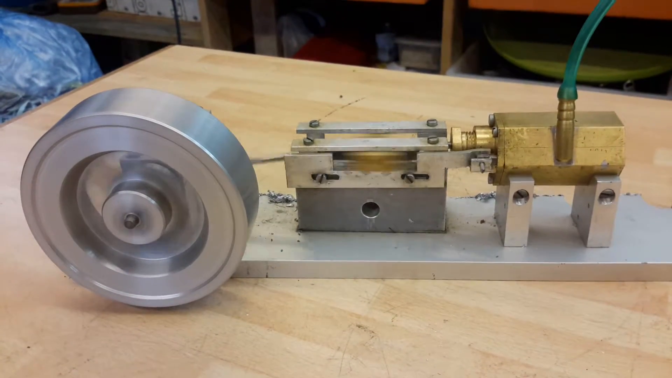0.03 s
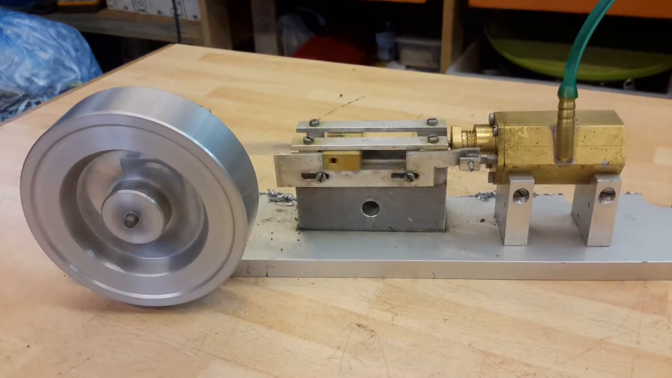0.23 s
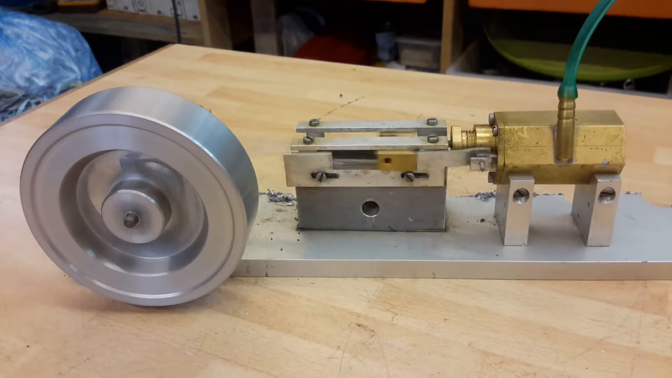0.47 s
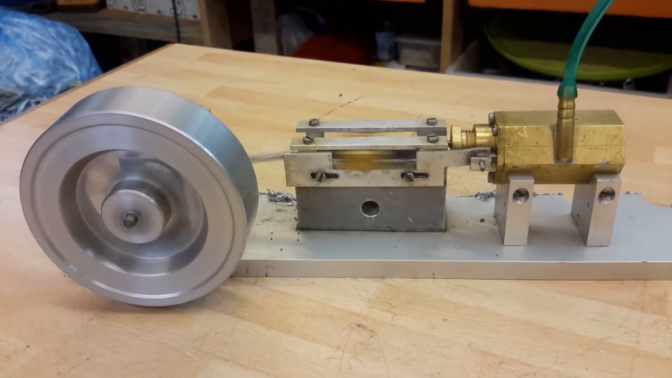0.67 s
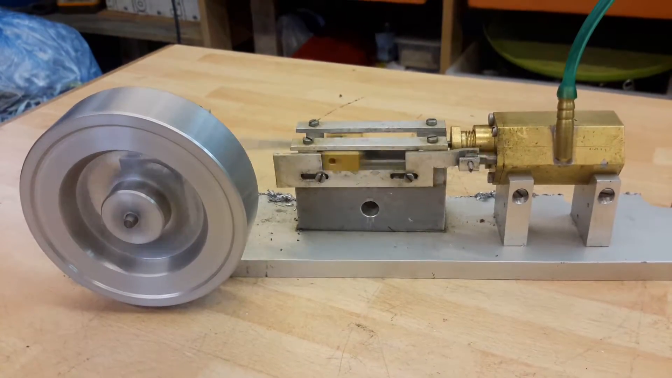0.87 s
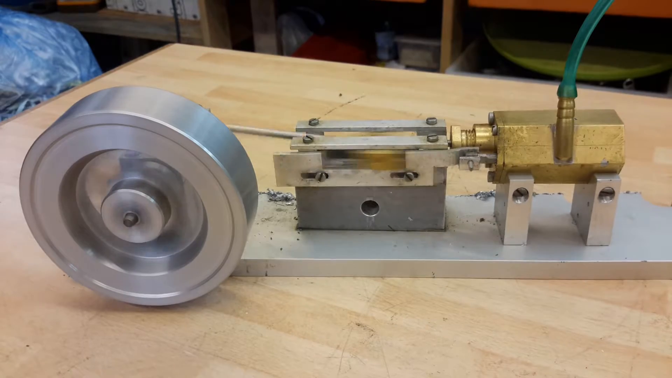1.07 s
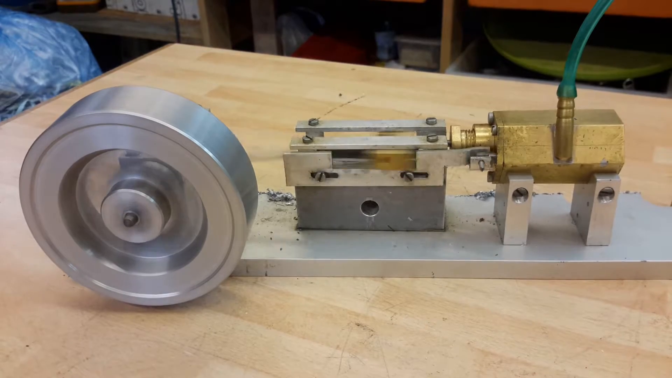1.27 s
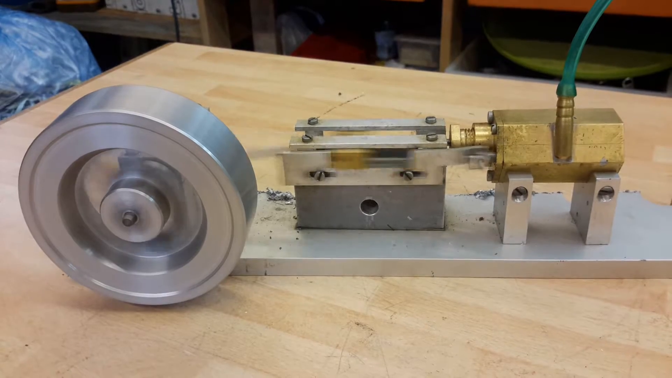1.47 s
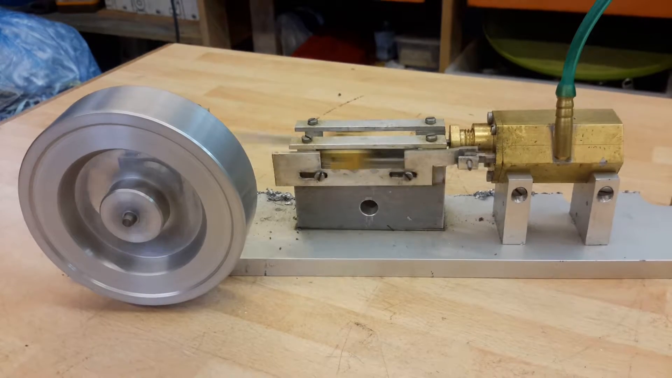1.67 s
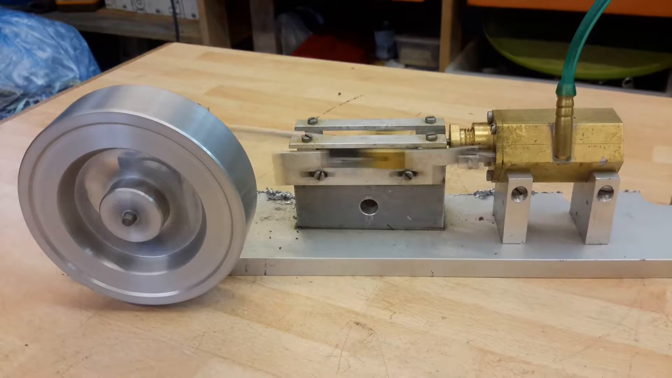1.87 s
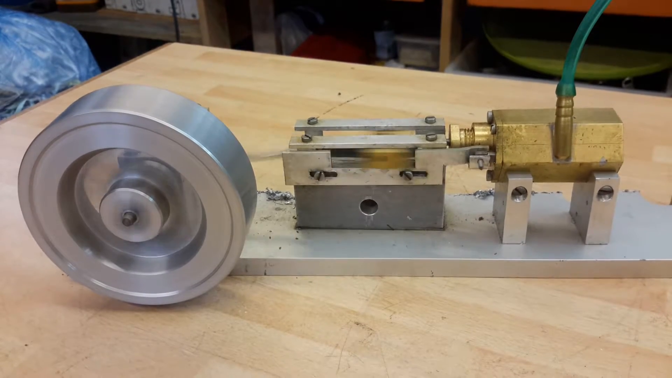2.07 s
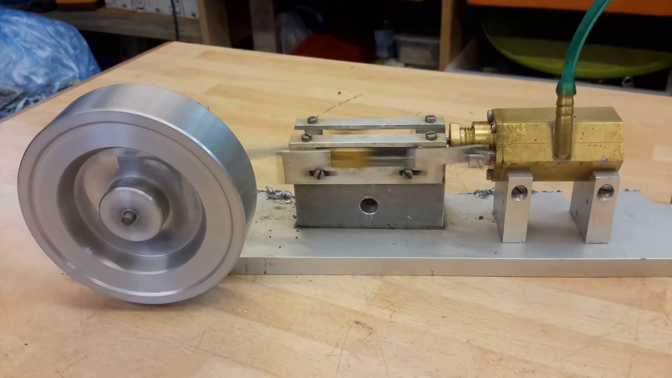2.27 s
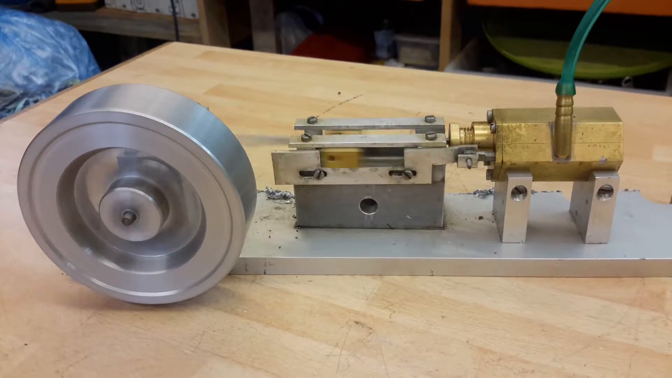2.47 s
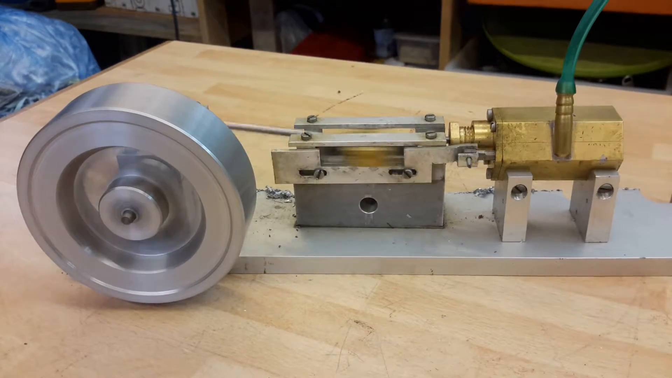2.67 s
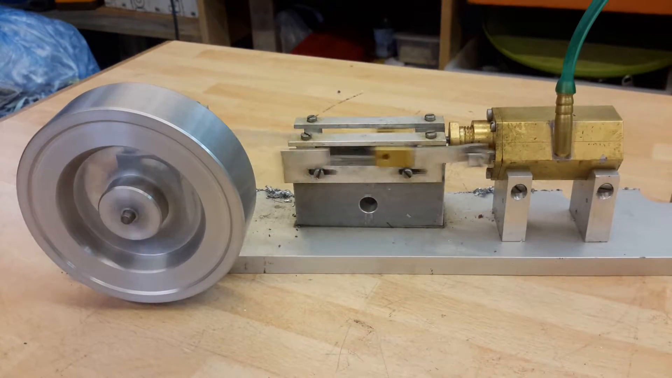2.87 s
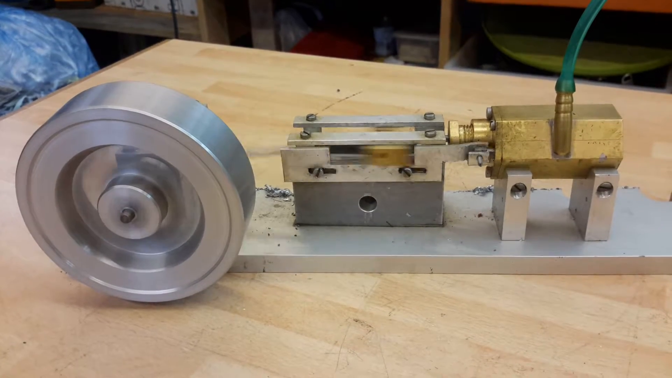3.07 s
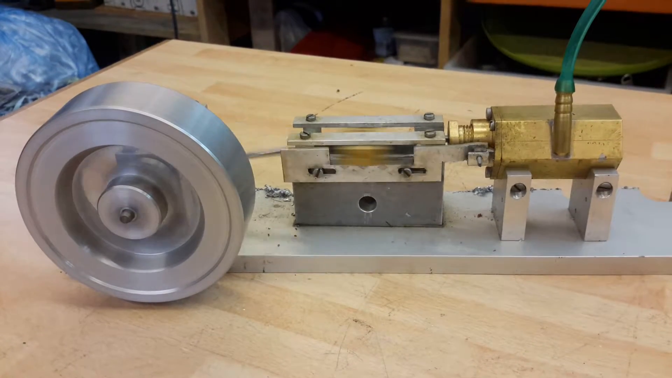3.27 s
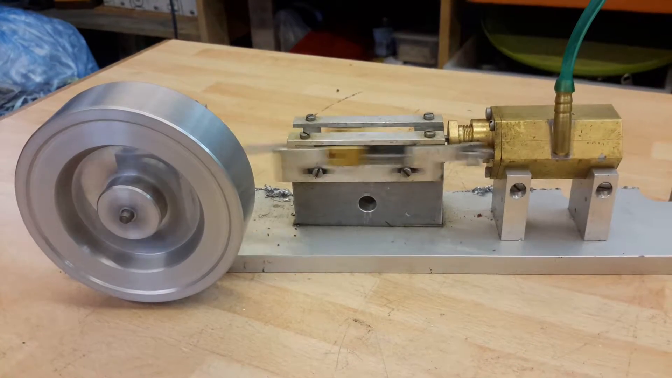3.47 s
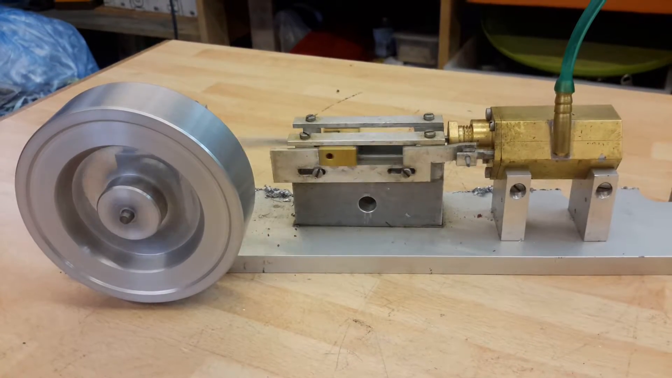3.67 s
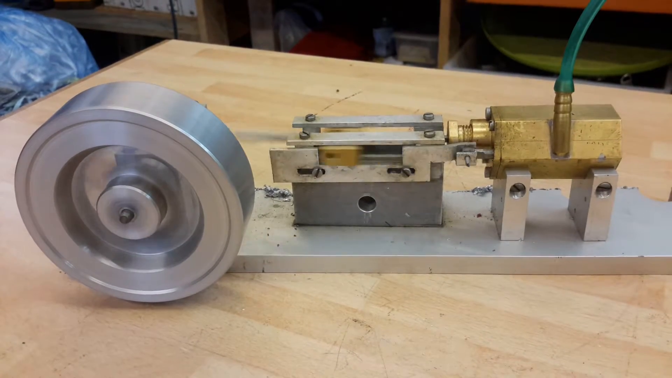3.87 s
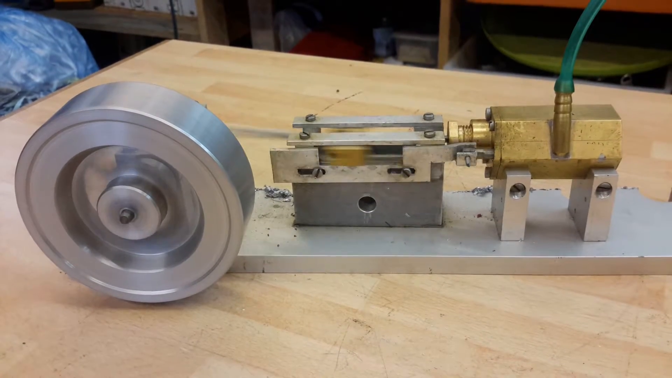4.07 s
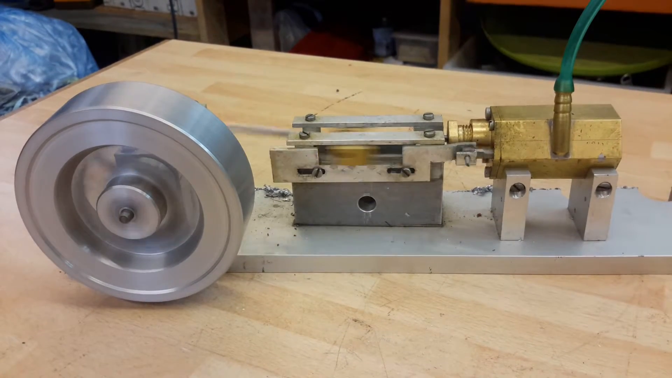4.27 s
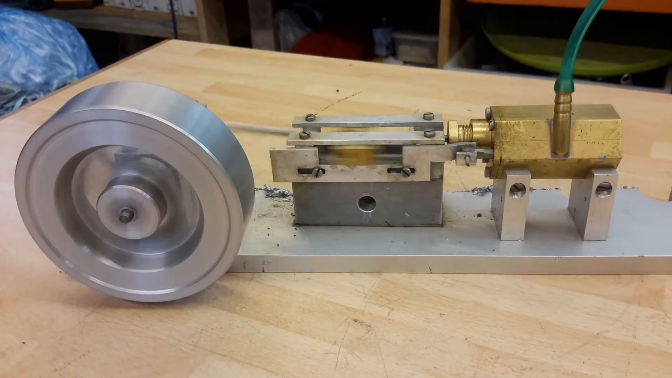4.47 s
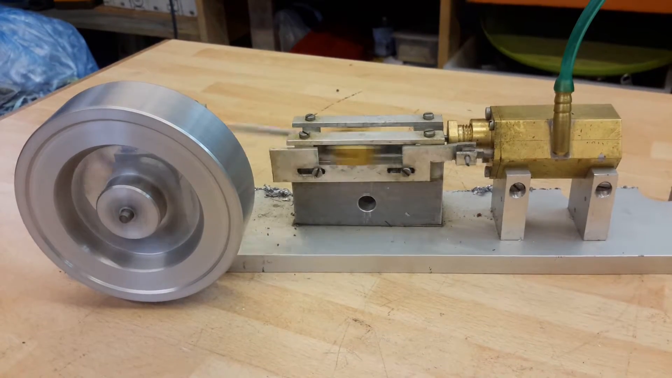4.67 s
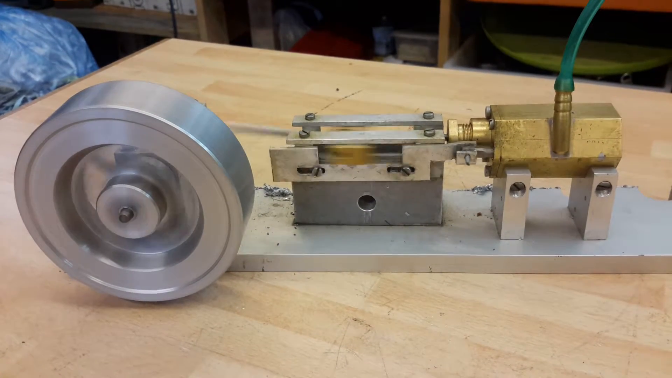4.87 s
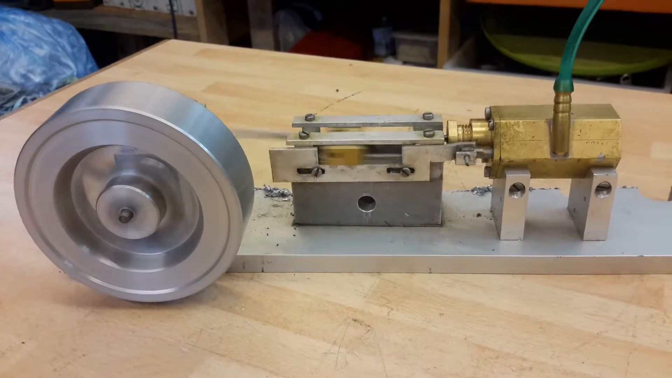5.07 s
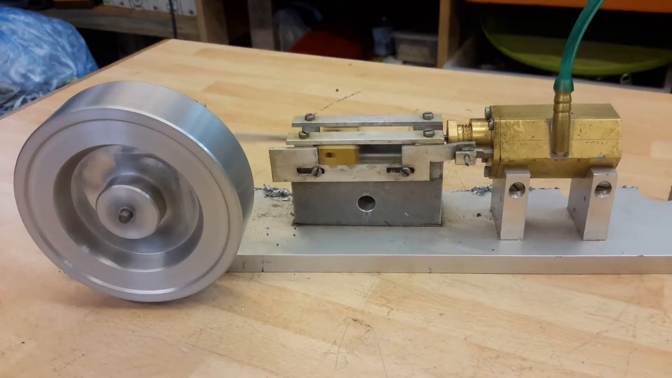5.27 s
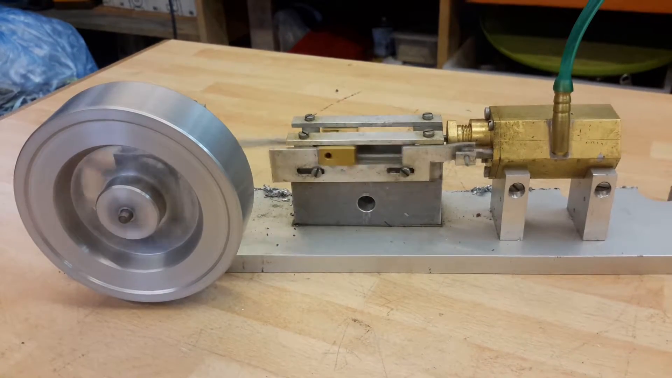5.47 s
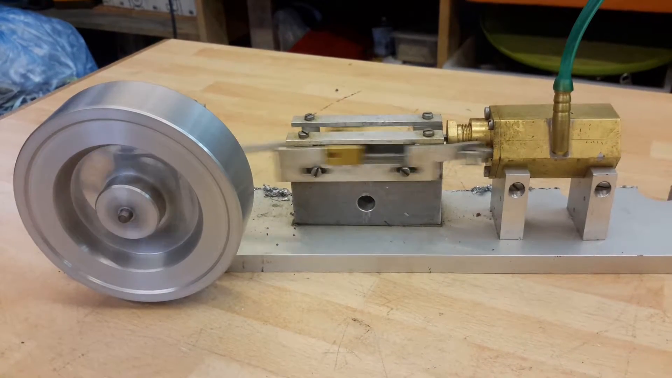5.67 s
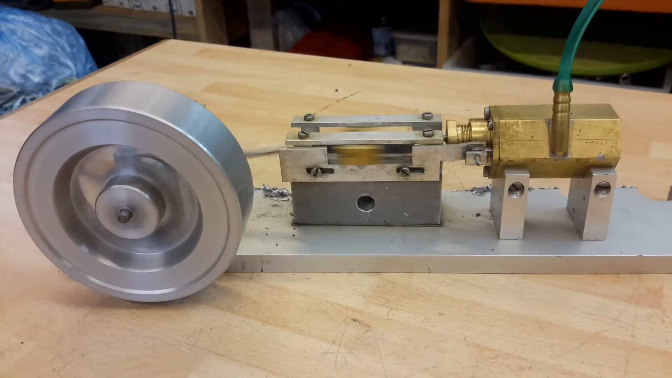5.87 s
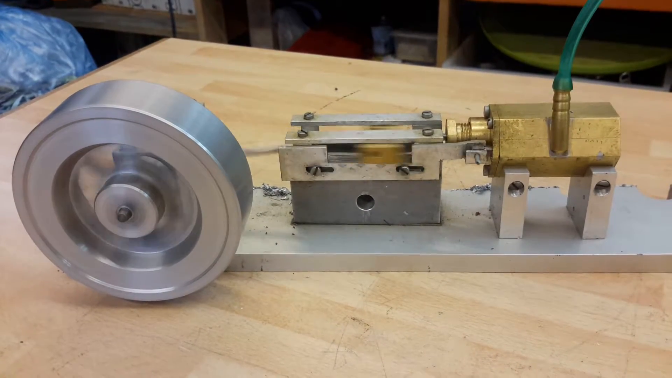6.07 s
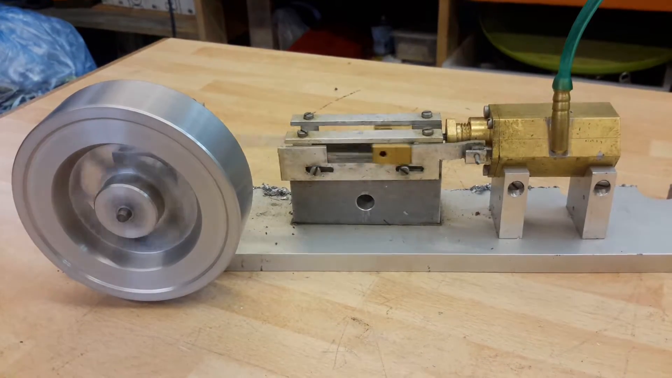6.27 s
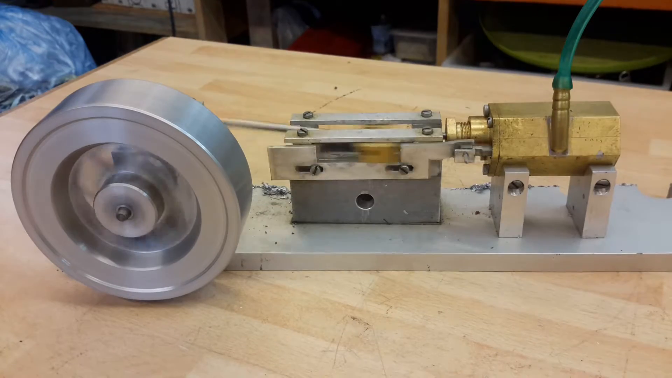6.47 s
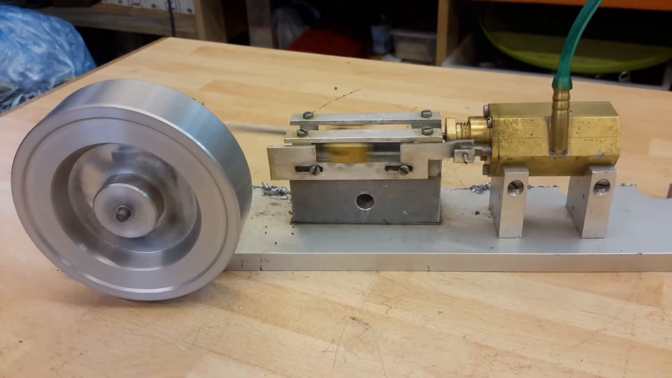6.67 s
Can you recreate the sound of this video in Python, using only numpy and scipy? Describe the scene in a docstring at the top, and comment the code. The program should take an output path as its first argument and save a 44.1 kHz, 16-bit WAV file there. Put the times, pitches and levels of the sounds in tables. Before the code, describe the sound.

A small model steam engine is already running fast on a wooden workbench, heard close up in a small workshop. It gives about thirteen sharp exhaust beats a second, alternating light and heavy, each with a short metallic knock and a soft thump through the bench. A steady leaking hiss, faint bearing rub and a low hum lie underneath. At about 1 second the rhythm skips slightly, and a soft rumble swells and fades by about 2 seconds. From there the engine slows steadily. The beats grow a little softer and duller, the hiss and rubbing weaken, and small metal clacks stand out more clearly. By 5 seconds there are fewer than ten beats a second. The engine is still chuffing evenly, at about eight beats a second, when the sound ends just before 7 seconds.

```python
"""In a small workshop, a single-cylinder model steam engine runs on a wooden bench and slowly loses speed.
Each turn releases two sharp exhaust beats, one light and one heavy. These impulses excite the
resonances of the metalwork, thump the bench and scatter round the room. Between the beats the
glands hiss, the bearings rub and the bench hums under the flywheel. The sound is close and mono."""
import sys
import numpy as np
from scipy import signal
from scipy.fft import rfft, irfft
from scipy.io import wavfile
from scipy.ndimage import uniform_filter1d

SR = 44100
rng = np.random.default_rng(int(sys.argv[2]) if len(sys.argv) > 2 else 0)


def transcribe(u):
    """Save the signal u as a 16-bit wav file named by the first command-line argument.

    u: samples, shape (n,) or (channels, n), limited to [-1, 1]; the rate is SR.
    q: integer samples, one column per channel.
    """
    v = np.clip(np.atleast_2d(u).T, -1, 1)
    q = np.round(v * 32767).astype(np.int16)
    wavfile.write(sys.argv[1], SR, q)


N = 296352

# modes of bench and base plate: (frequency [Hz], width [Hz], light-beat gain [dB], heavy-beat gain [dB])
BENCH_MODES = [(185.6, 77, -15, -15), (251.6, 36.4, -12, -2), (319, 18, -10, -11), (361.7, 25, -8.5, -2),
               (418.8, 42.4, 0.6, -1), (474.2, 16, -7, -4), (544.7, 59, -6, -7.5), (620.5, 17, -7, -6.5),
               (689.4, 61, -10.5, -9), (842, 190, -19.5, -21.5)]
# modes of ports and metalwork: (frequency [Hz], width [Hz], light-beat gain [dB], heavy-beat gain [dB])
METAL_MODES = [(1135, 123, -13.5, -18), (1412, 143, -11, -7), (1724, 186, -9, -33), (1840, 520, -12, -12),
               (2317, 130, -21, -8), (2685, 610, -20.5, -14), (3036, 49, -1.5, -12.5),
               (3140, 1270, -15, -17), (3846, 500, -13, -9.5), (4260, 580, -7.5, -6.5),
               (4607, 370, -11, -5.5), (5027, 530, -8, -7), (5450, 1890, -23.5, -15),
               (6000, 1601, -20.5, -20), (7780, 2220, -32.5, -21), (9530, 1100, -48.5, -27.5),
               (12140, 490, -62, -27.5)]
# spectrum of the gland leak: (frequency [Hz], relative spectral density [dB])
LEAK_SPECTRUM = [(20, -13), (55, -12.5), (150, -1), (250, 5.5), (450, 0.5), (900, -14.5), (1600, -5.5),
                 (3200, -3.5), (4700, 3.5), (6200, -9.5), (8500, -12.5), (11000, -21.5), (13000, -46),
                 (16000, -64)]
# rotation of the flywheel: (time [s], speed [turns/s])
FLYWHEEL_SPEED = [(0, 6.478), (2.0156, 6.2898), (3.6131, 5.6089), (5.1081, 4.7661), (6.72, 4.1305)]
# weighting of the heavy thump about 334 Hz: (time [s], gain below [dB], gain above [dB])
HEAVY_THUMP_BANDS = [(0, -33, -27.5), (1.6, -29, -31), (3, -29, -31.5), (3.8, -30.5, -34.5),
                     (5.2, -31.5, -30.5), (6.72, -28, -34.5)]
# hum of the bench: (time [s], frequency [Hz], relative level [dB])
BENCH_HUM = [(0, 100, -50.5), (1.6, 99, -47), (2.0, 93.5, -41), (2.8, 91.5, -50), (3.6, 91, -47.5),
             (4.4, 90.5, -49), (4.8, 90.5, -53.5), (6.72, 91, -56.5)]

# level laws: (gain at full speed [dB], change per turn/s lost [dB], change at eased pressure [dB])
LIGHT_CHUFF, LIGHT_THUMP = (-26, -1.88, -0.19), (-30.4, -1.4, -0.2)
HEAVY_CHUFF, HEAVY_TREBLE = (-24.5, -0.1, -3.5), (0.2, -3.12, 4.5)
LEAK, FRICTION, RUMBLE = (-37, -1.66, -0.36), (-42, -1.7, -4), (-54, 0.5, -4)

START_TURN, HEAVY_TURN, LIGHT_TURN = 0.4261, 0, 0.5207  # crank position at the start and at each beat
SKIP_S, SKIP_TURNS, SKIP_DB = 1.0909, 0.1488, -2.3  # the beats jump ahead once in their timing, and one beat comes softer
EASE_FROM_S, EASE_TO_S = 1.4, 3.4  # the supply pressure is eased off
SLOW_SPEED, FAST_SPEED = 5.35, 6.16  # the timbre of the beats changes between these [turns/s]
SURGE_S, SURGE_WIDTH_S = 1.35, 0.66  # rumble and friction swell and fade once
HOSE_SPACING_HZ, CUTOFF_HZ = 162.8, 15000

TIME = np.arange(N) / SR
AGE = np.arange(SR // 4) / SR  # time since the onset of a beat [s]
FREQS = np.arange(4097) * SR / 8192 + 1e-3


def undb(db):
    """Amplitude ratio of a level in decibels."""
    return 10 ** (np.asarray(db) / 20)


def unit_rms(x):
    """Normalisation to an rms of 1."""
    return x / np.sqrt(np.mean(x ** 2))


def curves(rows):
    """Linear interpolation of each column of a table over time."""
    times, *columns = np.transpose(rows)
    return [np.interp(TIME, times, column) for column in columns]


def wander(rate_hz):
    """Smoothed noise: a slow random fluctuation of rms 1."""
    hold = int(SR / rate_hz)
    steps = np.repeat(rng.standard_normal(N // hold + 1), hold)
    return unit_rms(uniform_filter1d(uniform_filter1d(steps, hold), hold)[:N])


def resonance(hz, width_hz):
    """Magnitude response of two equal resonators in cascade."""
    return 1 / (1 + ((FREQS / hz - hz / FREQS) * hz / width_hz) ** 2)


def modal_gain(modes, heavy):
    """Modes add in power; the light and the heavy beat excite each to a different degree."""
    powers = [(undb(dbs[heavy]) * resonance(hz, width)) ** 2 for hz, width, *dbs in modes]
    return np.sqrt(sum(powers))


def shelf(hz, db):
    """Magnitude response of a shelving filter that raises or lowers the band above hz."""
    return undb(db / (1 + (hz / FREQS) ** 4))


def colour(x, gain):
    """Minimum-phase filter of the given spectral shape; white noise keeps its power."""
    cepstrum = irfft(np.log(gain / gain.max() + 1e-5))
    half = len(cepstrum) // 2
    cepstrum[1:half] *= 2
    cepstrum[half + 1:] = 0
    response = irfft(np.exp(rfft(cepstrum)))[:half]
    return signal.oaconvolve(x, response / np.linalg.norm(response))[:N]


def tilt(x, hz, low_db, high_db):
    """A crossover at hz weights the low band and its complement separately."""
    low = signal.sosfiltfilt(signal.butter(2, hz, fs=SR, output="sos"), x)
    return undb(low_db) * low + undb(high_db) * (x - low)


def pulse(delay_s, rise_s, decay_s):
    """Delayed envelope with exponential rise and decay; peak 1."""
    age = np.maximum(AGE - delay_s, 0)
    shape = (1 - np.exp(-age / rise_s)) * np.exp(-age / decay_s)
    return shape / shape.max()


def whiten(x, bins):
    """Whitening by the locally averaged spectrum leaves only the fine ripple of reflections; energy 1."""
    spectrum = rfft(x)
    power = np.abs(uniform_filter1d(np.abs(spectrum) ** 2, bins)) + 1e-18
    flat = irfft(spectrum / np.sqrt(power), len(x)) * (AGE < 0.18)
    return flat / np.linalg.norm(flat)


def speed():
    """Rotation rate of the flywheel in turns per second."""
    return curves(FLYWHEEL_SPEED)[0]


def turns():
    """Position of the beat cycle in turns: the integral of speed, plus one sudden jump ahead in the timing of
    the beats."""
    return START_TURN + np.cumsum(speed()) / SR + SKIP_TURNS * (TIME >= SKIP_S)


def slowness():
    """Crossfade weight: 0 at high speed, 1 at low speed."""
    return np.clip((FAST_SPEED - speed()) / (FAST_SPEED - SLOW_SPEED), 0, 1)


def level(law):
    """Gain in dB, linear in the speed lost and in the easing of the supply pressure."""
    full_db, slowing_db, eased_db = law
    lost = speed()[0] - speed()
    eased = np.interp(TIME, [EASE_FROM_S, EASE_TO_S], [0, 1])
    return full_db + slowing_db * lost + eased_db * eased


def surge(peak_db):
    """Gaussian rise and fall of level, in dB."""
    return peak_db * np.exp(-((TIME - SURGE_S) / SURGE_WIDTH_S) ** 2)


def bench_drone():
    """Forced vibration of the bench under the flywheel: a wavering hum and a soft rumble."""
    hum_hz, hum_db = curves(BENCH_HUM)
    wavering_hz = hum_hz * (1 + 0.0185 * wander(15))
    tone = unit_rms(np.sin(2 * np.pi * np.cumsum(wavering_hz) / SR))
    hum = tone * undb(hum_db - 3.5 + 1.8 * wander(12))
    rumble = colour(rng.standard_normal(N), resonance(127, 114))
    return hum + rumble * undb(level(RUMBLE) + surge(peak_db=10.5))


def bearings():
    """Sliding friction of shaft and crosshead makes uneven noise that weakens as the engine slows."""
    spectrum = resonance(403, 660) + undb(-21) * resonance(1250, 830)
    rubbing = colour(rng.standard_normal(N), spectrum)
    return rubbing * undb(level(FRICTION) + surge(peak_db=3.5) + 2.2 * wander(30))


def hose_comb(reflection):
    """Standing waves in the supply hose act as a comb filter around the whistle of the ports."""
    feedback = reflection * resonance(4500, 2300)
    return 1 / np.abs(1.5 - feedback * np.exp(2j * np.pi * FREQS / HOSE_SPACING_HZ))


def gland_leak():
    """Turbulent leakage hisses throughout; a finer hiss builds up before each heavy beat."""
    hz, db = np.transpose(LEAK_SPECTRUM)
    spectrum = undb(np.interp(np.log(FREQS), np.log(hz), db))
    steady = colour(rng.standard_normal(N), spectrum * hose_comb(0.15))
    phase = (turns() - HEAVY_TURN) % 1
    fine = phase ** 4 * colour(rng.standard_normal(N), resonance(5600, 2100))
    return undb(level(LEAK) + 0.26 * wander(24.97)) * (steady + undb(-5.5) * fine)


def crank_passes(turn):
    """Beats are phase-locked to the crank: time [s] and accent [dB] of each pass through one position."""
    crank = turns()
    positions = np.arange(np.ceil(crank[0] - turn) + turn, crank[-1])
    times = np.interp(positions, crank, TIME)
    at_skip = np.abs(times - SKIP_S) < 2 / SR
    return times, 0.2 * rng.standard_normal(len(times)) + SKIP_DB * at_skip


def beats(times, dbs, envelope, turbulence, drift, bins):
    """Multipath scattering: beats share slowly drifting paths, and turbulence adds fresh noise to each."""
    paths_a, paths_b = rng.standard_normal((2, len(AGE)))
    fresh = rng.standard_normal((len(times), len(AGE)))
    train = np.zeros(N + len(AGE))
    for onset_s, db, gas in zip(times, dbs, fresh):
        angle = drift * onset_s / TIME[-1]
        paths = np.cos(angle) * paths_a + np.sin(angle) * paths_b + turbulence * gas
        start = int(onset_s * SR)
        train[start:start + len(AGE)] += undb(db) * whiten(paths * envelope, bins)
    return train * np.sqrt(SR / 20)  # a beat's level is its energy spread over 50 ms


def light_stroke():
    """Impulse excitation: a knock rings the metal, exhaust reverberates and the bench booms late."""
    times, accent_db = crank_passes(LIGHT_TURN)
    chuff_db = accent_db + np.interp(times, TIME, level(LIGHT_CHUFF))
    thump_db = accent_db + np.interp(times, TIME, level(LIGHT_THUMP))
    metal = modal_gain(METAL_MODES, heavy=False)
    wall_echo = undb(-2.5) * pulse(0.00865, 0.00046, 0.0027)
    hit = np.hypot(pulse(0, 0.00044, 0.0029), wall_echo)
    knock = colour(beats(times, chuff_db, hit, turbulence=0.35, drift=0.87, bins=256), metal)
    # the crosshead slaps twice in its guide, plainer at low speed
    slap_shape = np.hypot(pulse(0, 0.00018, 0.00082), undb(-4.5) * pulse(0.0113, 0.00046, 0.0019))
    slaps = beats(times, chuff_db, slap_shape, turbulence=0.24, drift=0.89, bins=128)
    clack = undb(-15 + 3.5 * slowness()) * colour(slaps, resonance(1662, 420))
    wash = undb(-7) * pulse(0.0078, 0.0019, 0.015) + undb(-10.5) * pulse(0, 0.0022, 0.046)
    exhaust = beats(times, chuff_db, wash, turbulence=0.95, drift=1.1, bins=96)
    rush = colour(exhaust, metal * hose_comb(0.66))
    # escaping gas wheezes after the knock
    trail = beats(times, chuff_db, pulse(0.0076, 0.009, 0.015), turbulence=1.8, drift=0.93, bins=96)
    wheeze = undb(-12.5) * colour(trail, resonance(3510, 780))
    boom = pulse(0.0024, 0.0062, 0.014) + undb(-26) * pulse(0, 0.001, 0.024)
    bench_force = beats(times, thump_db, boom, turbulence=0.47, drift=1.66, bins=20)
    thump = colour(bench_force, modal_gain(BENCH_MODES, heavy=False))
    chuff = tilt(undb(-4) * (knock + rush), hz=2200, low_db=0, high_db=-1.4)
    return chuff + clack + wheeze + thump


def heavy_stroke():
    """Sudden pressure release: the port cracks open, the main blow rings the metal, exhaust rushes out."""
    times, accent_db = crank_passes(HEAVY_TURN)
    chuff_db = accent_db + np.interp(times, TIME, level(HEAVY_CHUFF))
    metal = modal_gain(METAL_MODES, heavy=True)
    slow = slowness()
    crack = undb(-2.5) * pulse(0, 0.00047, 0.0034)
    blow = pulse(0.0016, 0.00035, 0.00086)
    echo = undb(-3) * pulse(0.01015, 0.00015, 0.0019)
    hit = np.sqrt(crack ** 2 + blow ** 2 + echo ** 2)
    hits = beats(times, chuff_db, hit, turbulence=0.1, drift=1.0, bins=256)
    knock = undb(-4 - 1.9 * slow) * colour(hits, metal * shelf(7800, db=-5.5) * shelf(12000, db=6.5))
    # a hollow ring gives way to a lower one as the engine slows
    ring = beats(times, chuff_db, pulse(0.0015, 0.00083, 0.01), turbulence=0.47, drift=0.49, bins=64)
    hollow = (1 - slow) * colour(ring, resonance(2970, 340)) + slow * colour(ring, resonance(2570, 370))
    # the crosshead slaps once in its guide, plainer at low speed
    slap_shape = pulse(0.00029, 0.00021, 0.0015)
    slaps = beats(times, chuff_db, slap_shape, turbulence=0.085, drift=0.88, bins=128)
    clack = undb(-16 + 3.9 * slow) * colour(slaps, resonance(1580, 650))
    wash = undb(-7.5) * pulse(0.0092, 0.0039, 0.022) + undb(-9) * pulse(0, 0.0013, 0.026)
    exhaust = beats(times, chuff_db, wash, turbulence=1.0, drift=1.54, bins=96)
    rush = undb(-2.5 + 0.78 * slow) * colour(exhaust, metal * hose_comb(0.4))
    # the bench answers late and low
    boom = pulse(0.015, 0.0042, 0.012) + undb(-4) * pulse(0, 0.0028, 0.0046)
    bench_force = beats(times, accent_db, boom, turbulence=0.18, drift=1.53, bins=20)
    thump = colour(bench_force, modal_gain(BENCH_MODES, heavy=True))
    chuff = tilt(knock + undb(-13.5) * hollow + rush, hz=2500, low_db=0, high_db=level(HEAVY_TREBLE))
    return chuff + clack + tilt(thump, 334, *curves(HEAVY_THUMP_BANDS))


def scene():
    """Superposition of all sources, alike in both channels."""
    engine = light_stroke() + heavy_stroke() + gland_leak() + bearings() + bench_drone()
    return np.array([engine, engine])


def record(dry):
    """Band limiting: a steep elliptic low-pass removes the highest treble."""
    return signal.sosfilt(signal.ellip(8, 0.2, 70, CUTOFF_HZ, fs=SR, output="sos"), dry)


dry = scene()
out = record(dry)
transcribe(out)
```